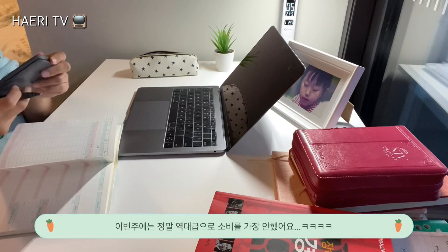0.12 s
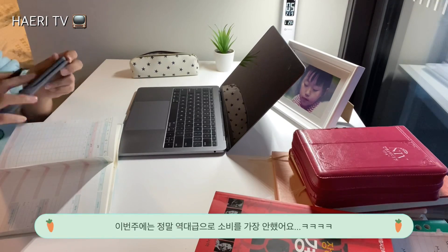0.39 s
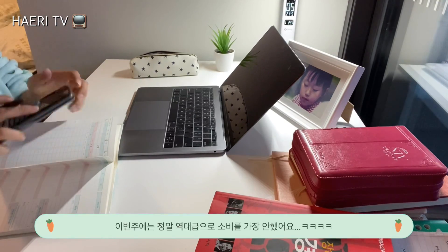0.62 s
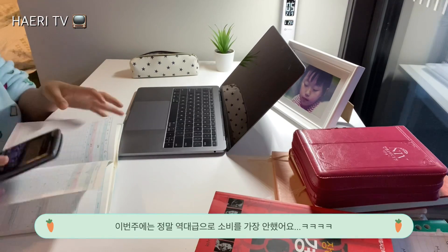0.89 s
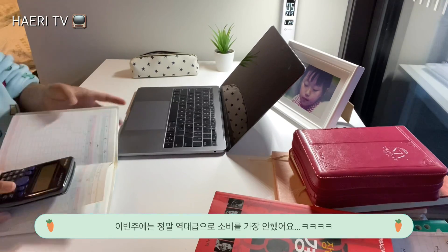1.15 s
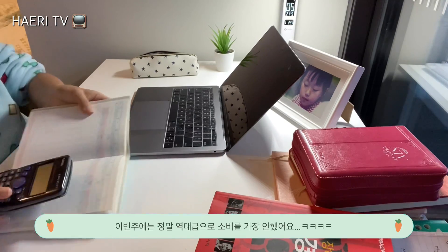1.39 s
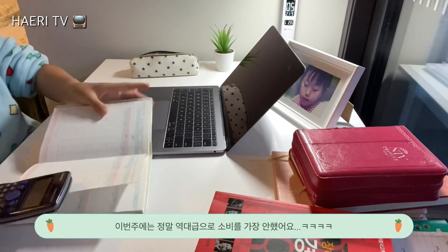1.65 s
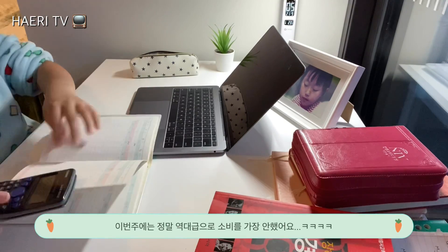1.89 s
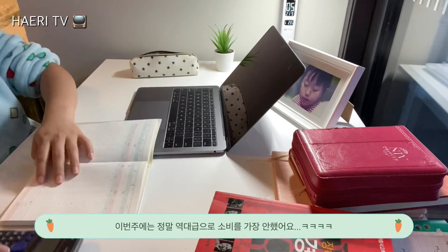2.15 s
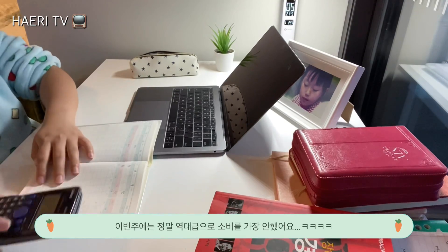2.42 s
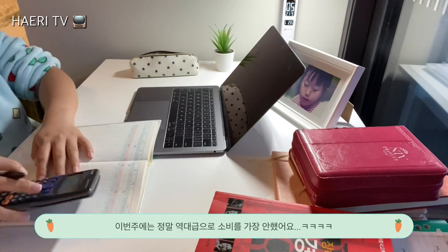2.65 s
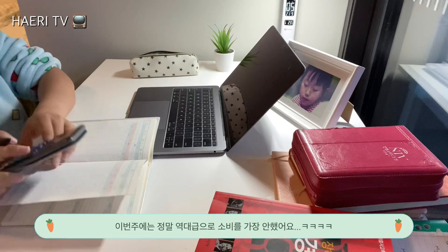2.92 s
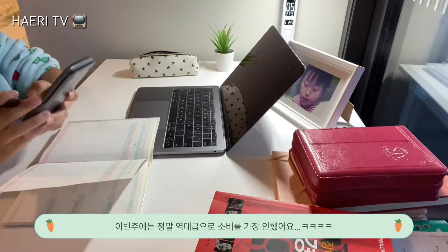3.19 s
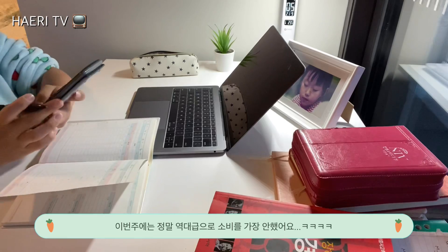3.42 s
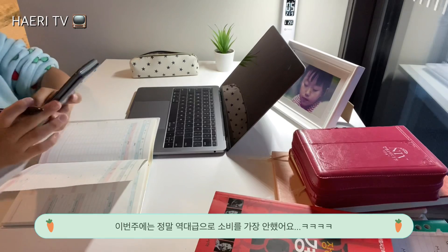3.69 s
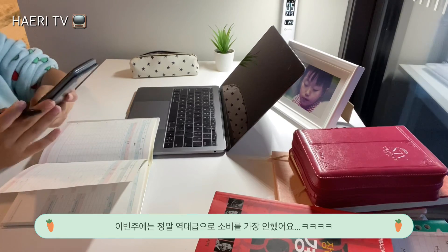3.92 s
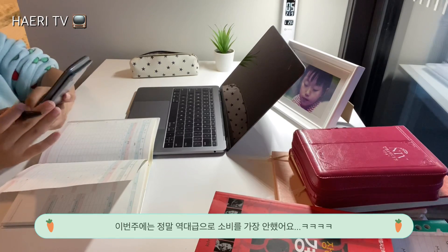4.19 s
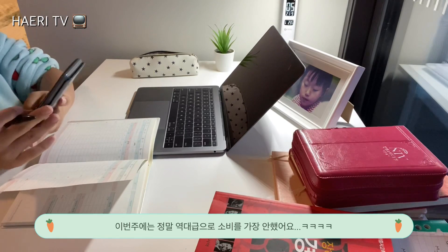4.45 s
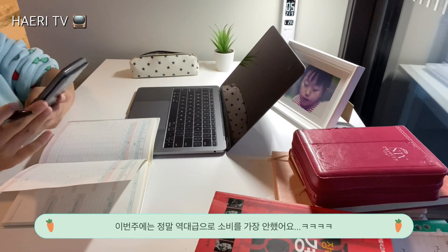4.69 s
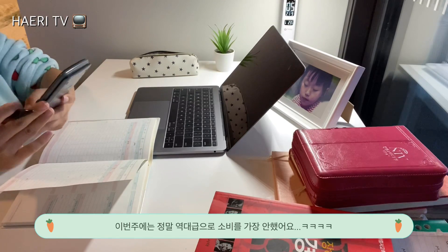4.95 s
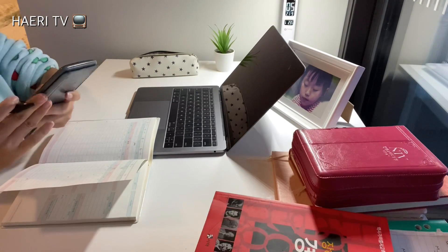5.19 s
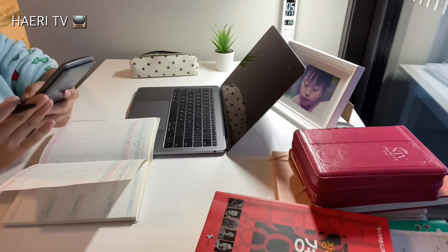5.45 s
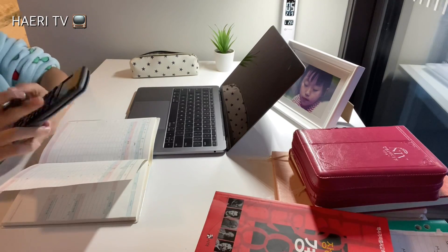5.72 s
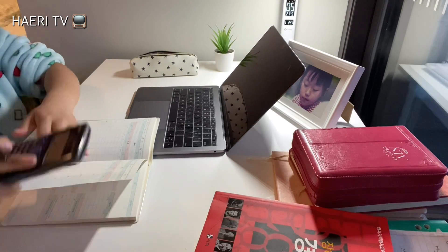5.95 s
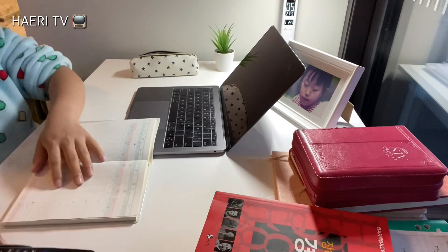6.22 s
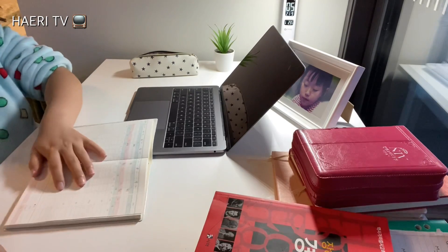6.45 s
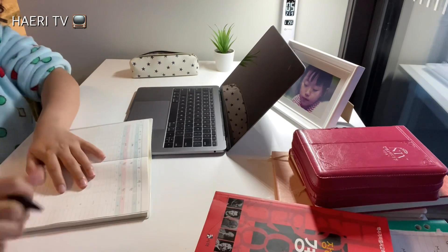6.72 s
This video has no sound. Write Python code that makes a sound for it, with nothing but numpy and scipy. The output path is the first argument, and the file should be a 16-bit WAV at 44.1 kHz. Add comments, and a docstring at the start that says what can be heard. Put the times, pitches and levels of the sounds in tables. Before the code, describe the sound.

In a small quiet room, close to the microphone, a notebook slides and flaps on a desk with light taps and dull thumps. Thin, very quiet calculator key clicks follow for about two seconds. After a brief lull, paper snaps, a calculator lands with a firm knock, and a pen hits the desk with the loudest, sharpest crack. Low room tone lies underneath.

```python
"""Hands at a desk in a small quiet room: a notebook is slid, lifted and patted flat, a calculator's keys are
pressed, then the calculator and a pen are put down hard. Taps and keys are noise snaps with a broad ring,
flapping pages are puffs of noise, rubbing is clumped random grains. Taps excite decaying desk modes near
120 Hz and up; echoes and noise tails give the room, over a low room tone. The recorder turns steady sound down."""
import sys
import numpy as np
from scipy import signal
from scipy.fft import rfft, irfft
from scipy.io import wavfile
from scipy.ndimage import uniform_filter1d

SR = 44100
rng = np.random.default_rng(int(sys.argv[2]) if len(sys.argv) > 2 else 0)


def invert_db(x):
    """Field ratio 10**(x/20) for x, a level in decibels (scalar or array-like)."""
    u = np.asarray(x, float) / 20
    return 10 ** u


def bounce(signal):
    """Save signal as a 16-bit WAV file at the path given by the first command-line argument."""
    frames = np.transpose(np.atleast_2d(signal))
    limited = np.clip(frames, -1, 1)
    pcm = np.round(limited * 32767).astype(np.int16)
    wavfile.write(sys.argv[1], SR, pcm)


N = 302085  # samples

# Source levels below are relative, ahead of the mix gains.
# Fingers, calculator and pen meeting paper or desk. Each row: start in seconds, click level in dB, ring in Hz,
# treble in dB re the click, weight in dB.
TAP_ROWS = [(0.3405, -49, 1040, -0.5, -59), (0.6562, -58, 1030, -2, -48), (0.676, -57, 703, -5, -49),
            (0.789, -53, 4000, 0, -66), (0.797, -56, 4400, 0, -67), (0.827, -50, 4200, 4.5, -70),
            (0.85, -48.5, 1040, -30, -55), (1.22, -49, 1300, -4, -64), (1.3709, -55.5, 1090, -27, -70),
            (1.4655, -38, 1010, -3, -34.5), (1.6807, -48, 710, -17, -41.5), (1.704, -45, 1040, -13, -49.5),
            (1.77, -55, 767, -17, -52.5), (1.8286, -58, 960, -17, -51.5), (1.9241, -46.5, 1390, -7, -58),
            (1.9403, -46, 1290, -7, -60), (2.187, -50.5, 770, 7.5, -42), (2.7395, -59, 1650, -3, -55.5),
            (2.7665, -48.5, 1410, -22, -58.5), (2.841, -61, 1100, -9, -66), (2.9284, -46, 3000, -4, -57),
            (2.9483, -46.5, 1560, -29, -64), (3.0043, -50, 1280, -8, -52.5), (3.0295, -49, 7500, -19, -67),
            (3.1181, -58, 1040, -17, -67), (5.855, -65.5, 3780, -10, -68), (5.911, -60, 1010, -3, -55),
            (5.9438, -44.5, 6280, -13, -65), (5.9695, -53, 1380, -17, -88), (5.987, -45, 1070, -4, -54.5),
            (6.1738, -66, 2800, -5, -51.5), (6.2354, -29, 820, 1.5, -30), (6.2505, -46, 770, -12, -33.5),
            (6.4558, -53, 3800, -5, -56.5), (6.4852, -43, 820, -11.5, -41),
            (6.5374, -11.5, 1340, -6.5, -21), (6.548, -17.5, 2430, -5, -29.5),
            (6.5556, -18, 1390, -15, -21)]
# Calculator keys. Each row: start in seconds, click level in dB, ring in Hz, treble in dB re the click,
# ring in dB re the click.
KEY_ROWS = [(3.259, -66.5, 3900, 8, -6), (3.3825, -50.5, 4150, 5.5, -6), (3.5338, -53.5, 3870, -33, -30),
            (3.7, -62.5, 1170, -16, -5), (3.7405, -57.5, 3850, -10, -9), (3.8171, -63, 3750, -30, -19),
            (4.0124, -54, 3650, -2, -11), (4.056, -56.5, 4160, -29, -10), (4.124, -61, 2400, -20, -7),
            (4.1654, -66, 2840, -4, -5), (4.49, -58, 1820, -3.5, -5.5), (4.667, -60, 4320, 0, -7),
            (4.8953, -57.5, 570, -6, -6), (4.9944, -51, 660, -7.5, -15), (5.0518, -55.5, 3850, 6, -14),
            (5.1245, -61, 1730, -22, -11), (5.157, -54, 4160, 0.5, -23), (5.3549, -59, 1800, -3.5, -16)]
# Pages flexing and pushing air. Each row: crest in seconds, level in dB, centre in Hz, rise in seconds,
# fall in seconds.
FLAP_ROWS = [(.70, -48.5, 820, 0.029, 0.016), (.885, -56, 600, 0.023, 0.012),
             (1.04, -57.5, 1250, 0.052, 0.038), (1.237, -42, 1290, 0.0074, 0.0095),
             (1.668, -49.5, 2800, 0.013, 0.0092), (1.712, -40, 990, 0.0083, 0.011),
             (1.957, -38.5, 1320, 0.011, 0.0042), (3.02, -57.5, 386, 0.066, 0.037),
             (5.998, -36.5, 1204, 0.0095, 0.0028)]
# Paper and skin sliding, one table a stroke. Each row: time in seconds, level in dB, treble in dB re that,
# low band in dB re that.
RUB_STROKES = [
    [(0.655, -76.5, 13, 21), (0.728, -76.5, 8.5, 23), (0.796, -63, 2, -4), (0.9, -77, -9, 17),
     (0.96, -74.5, -8, 8), (1.034, -60.5, -6.5, -2.5), (1.146, -88, -10, 18)],
    [(1.18, -79, 8, 1), (1.19, -65.5, 2.5, 8), (1.215, -81, 0, 14), (1.232, -54.5, -14, -5),
     (1.254, -65, 0, 9), (1.346, -72.5, 7, 3), (1.445, -75.5, 12.5, 9.5), (1.462, -56, 5, -3)],
    [(1.5, -64, 5.5, 11.5), (1.57, -68.5, 0, 0), (1.644, -58, 1, -6.5), (1.665, -70.5, 17, 19.5),
     (1.712, -74.5, 7, 18.5), (1.79, -86, 15, -3)],
    [(1.8, -78, 8, 6), (1.918, -70, -7, -4), (1.952, -56.5, 2, 12), (2.01, -69.5, -1, 12),
     (2.06, -89, -12, 29.5)],
    [(2.68, -77, -12, -9), (2.77, -68.5, 3, 6), (2.818, -79.5, 8, 15), (2.868, -73, 8.5, -7),
     (2.908, -77.5, 5, -2), (2.934, -50.5, 2.5, -6.5), (3.026, -85, 9, -14), (3.076, -74, 1, -10),
     (3.15, -97, -2, 6)],
    [(5.845, -77, 8, -13), (5.94, -78, -1, 8.5), (5.996, -71, 7, 17.5), (6.076, -70, 3, 9.5),
     (6.21, -90, 2, 23.5)],
]
# Desk shaken by the moving notebook. Each row: time in seconds, level in dB.
SHAKE_LEVELS = [(0.6, -61), (0.69, -66), (0.77, -77), (0.89, -53.5), (1.43, -68), (1.51, -44.5),
                (1.64, -57), (1.7, -39.5), (1.82, -60), (1.88, -54), (2.17, -59.5), (2.29, -53.5),
                (2.44, -73), (2.78, -68.5), (3.0, -52), (3.26, -88), (3.38, -57), (3.68, -76)]
# Desk top modes. Each row: frequency in Hz, level in dB, t60 in seconds.
DESK_MODES = [(122.9, 3.5, 0.49), (282.7, -9.5, 0.4), (439.4, -17.5, 0.4), (533, -9, 0.22),
              (780, -38, 0.14), (895, -8, 0.11), (850, -20, 0.057)]
# Room decay. Each row: frequency in Hz, t60 in seconds.
ROOM_T60 = [(150, 0.59), (500, 0.65), (1500, 0.49), (4000, 0.56), (8000, 0.44), (13000, 0.32)]
# Spectrum of the tail of a blow just past. Each row: frequency in Hz, relative density in dB per Hz.
EARLIER_SPECTRUM = [(35, -47), (60, -11), (113, -11), (214, -17), (341, -6), (469, -24.5), (631, -5.5),
                    (763, -23.5), (1050, -4.5), (1640, -16), (1820, -14), (8190, -22), (9500, -22),
                    (12400, -52.5), (20900, -120)]
# Room tone spectrum. Each row: frequency in Hz, relative density in dB per Hz.
AIR_SPECTRUM = [(15, -31), (25, -2), (60, -1), (95, -4), (124, 0), (152, -10.5), (305, -20.5), (650, -29),
                (1050, -24.5), (1400, -27), (2200, -30.5), (4000, -37), (8000, -39.5), (16000, -45)]
# Room tone balance. Each row: frequency in Hz, left minus right in dB.
AIR_BALANCE = [(60, -2), (380, -2.5), (2380, -1), (15000, 0)]
# Left-right likeness of diffuse sound. Each row: frequency in Hz, likeness from 0 to 1.
LIKENESS = [(40, 0.88), (130, 0.64), (290, 0.44), (640, 0.011), (15000, 0.1)]
# Echoes off desk top, laptop screen and wall. Each row: left delay in seconds, left level in dB, right level in dB.
NEAR_ECHOES = [(.0011, -18.5, -16), (.0026, -4, -0.5), (.0047, -5.5, -12.5), (.0083, -7, -8.5),
               (0.0126, -7.5, -6), (.018, -11, -12)]
# Most that the suppressor lowers steady sound. Each row: frequency in Hz, gain in dB.
DUCKING_DEPTH = [(250, -4.5), (600, -5.5), (2000, -10.5), (15000, -3.5)]
# Microphone response. Each row: frequency in Hz, gain in dB.
MICROPHONE_RESPONSE = [(30, -1.5), (200, -1), (3500, -1), (5500, -1.5), (7700, -1.5), (9500, -5.5),
                       (12500, -6), (15800, -0.5), (16600, -26)]
# Treble bands that sound faint in the mid. Each row: low edge in Hz, high edge in Hz, gain in dB.
MID_FAINT_BANDS = [(9650, 11250, -12), (14420, 20000, -12)]
# Treble bands that sound faint in the side. Each row: low edge in Hz, high edge in Hz, gain in dB.
SIDE_FAINT_BANDS = [(7140, 8200, -25), (12640, 14700, -45)]


def evened(x):
    """Scales to rms 1."""
    return x / np.sqrt(np.mean(x ** 2) + 1e-20)


def peaked(x):
    """Scales the loudest 128-sample stretch to rms 1."""
    return x / np.sqrt(uniform_filter1d(x ** 2, size=128).max())


def read(points, hz):
    """Reads a table's curve on a log frequency axis."""
    f, value = np.transpose(points)
    return np.interp(np.log(hz + 1), np.log(f + 1), value)


def add(mix, start_s, sound):
    """Adds a sound into the mix in place."""
    part = mix[max(round(start_s * SR), 0):][:len(sound)]
    part += sound[:len(part)]


def band(x, lo_hz, hi_hz):
    """Butterworth band-pass."""
    sos = signal.butter(2, [lo_hz, min(hi_hz, .45 * SR)], "bandpass", fs=SR, output="sos")
    return signal.sosfilt(sos, x)


def resonate(x, hz, width_hz):
    """Moving resonance: shifts the curve hz down to zero, smooths, shifts back."""
    turn = np.exp(2j * np.pi * np.cumsum(hz) / SR)
    pole = np.exp(-np.pi * width_hz / SR)
    return 2 * (turn * signal.lfilter([1 - pole], [1, -pole], x / turn)).real


def lumps_gain(noise, size):
    """Slow random gain, within 4 dB either way."""
    return invert_db(2.0 * np.clip(evened(uniform_filter1d(noise, size=size)), -2, 2))


def click(db, hz, treble_db, ring_db, lo_hz, hi_hz, crack_s, scuff_db, ring_width_hz):
    """A snap, a few ms of crackle and a grainy scuff; treble apart; a broad resonance of the struck object."""
    t = np.arange(4000) / SR
    shape = np.exp(-t / crack_s) + invert_db(scuff_db) * np.exp(-t / 0.02)
    crack = rng.standard_normal((2, len(t))) * shape * (1 - np.exp(-t / 0.00021))
    crack[:, 20] += 4.5  # the snap evens out the spectrum
    z = rfft(crack)
    flat = z / np.sqrt(uniform_filter1d(abs(z) ** 2, size=16, axis=1))  # no pitch of its own
    crack = irfft(flat, len(t))
    ring_hz = np.full(len(t), hz)
    ring = peaked(resonate(resonate(crack[0], ring_hz, ring_width_hz), ring_hz, ring_width_hz))
    body = peaked(band(band(crack[0], lo_hz, hi_hz), lo_hz / 1.5, hi_hz * 1.74))
    treble = peaked(band(crack[1], 6000, 15500))
    return invert_db(db) * (body + invert_db(ring_db) * ring + invert_db(treble_db) * treble)


def taps():
    """Each tap: a click, and its weight going into the dull body of the paper stack and the desk."""
    body_db, boom_db = -1, 1.5
    heavy_db, heavy_share = -36.5, 0.68  # of the weight above heavy_db, the desk takes only a share
    air, push, t = np.zeros(N), np.zeros(N), np.arange(4000) / SR
    for s, db, hz, treble_db, weight_db in TAP_ROWS:
        add(air, s, click(db, hz, treble_db, ring_db=-7.5, lo_hz=hz / 2.34, hi_hz=hz * 3.1,
                          crack_s=0.0014, scuff_db=-25.5, ring_width_hz=600))
        body = band(rng.standard_normal(len(t)) * t * np.exp(-t / 0.0036), 166, 542)
        add(air, s, invert_db(weight_db + body_db) * peaked(body))
        held_back_db = (1 - heavy_share) * max(weight_db - heavy_db, 0)
        add(push, s, invert_db([boom_db + weight_db - held_back_db]))
    return air, push


def desk(push):
    """The desk top's modes build over the first cycles, on a short low lurch of the whole frame."""
    t = np.arange(SR // 2) / SR
    modes = sum(invert_db(db - 60 * t / t60_s) * np.sin(2 * np.pi * hz * t) for hz, db, t60_s in DESK_MODES)
    lurch = invert_db(-5.5 - 60 * t / 0.19) * np.sin(2 * np.pi * 62 * t)
    build = 1 - np.exp(-t / 0.0082)
    return signal.oaconvolve(push, (modes + lurch) * build)[:N]


def keys():
    """Thin plastic clicks with a soft low thud of the thumb."""
    thud_re_click_db, thud_hz, thud_t60_s = -3, 112, 0.22
    air, thud, t = np.zeros(N), np.zeros(N), np.arange(6000) / SR
    for s, db, hz, treble_db, ring_db in KEY_ROWS:
        add(air, s, click(db, hz, treble_db, ring_db, lo_hz=min(1100, 0.31 * hz), hi_hz=5300,
                          crack_s=0.001, scuff_db=-11.5, ring_width_hz=450))
        thud_db = db + thud_re_click_db - 60 * t / thud_t60_s
        add(thud, s, invert_db(thud_db) * np.sin(2 * np.pi * thud_hz * t))
    return air, thud


def flaps():
    """A soft-edged band of noise, broken into coarse lumps as the sheet buckles."""
    air = np.zeros(N)
    t = np.arange(-.08, .15, 1 / SR)
    for s, db, hz, rise_s, fall_s in FLAP_ROWS:
        noise, lumps = rng.standard_normal((2, len(t)))
        swell = np.exp(-(t / np.where(t < 0, rise_s, fall_s)) ** 2)
        puff = evened(band(band(noise, hz / 2.04, hz * 1.49), hz / 2.3, hz * 1.82))
        add(air, s - .08, invert_db(db) * puff * swell * lumps_gain(lumps, 150))
    return air


def rubs():
    """Fibres catch and let go: clumped random grains under each stroke; the sheet colours them as it bends."""
    # a sheet pressed harder than gently is tighter and sounds higher
    sheet_hz, sheet_hz_per_db, gentle_db = 1080, 21, -59.5
    air = np.zeros(N)
    clumps = lumps_gain(rng.standard_normal(N), 300)
    strength = invert_db(2.5 * np.minimum(rng.exponential(1, N), 4))
    present = rng.random(N) < .2
    grains = rng.standard_normal((3, N)) * strength * present * clumps
    mid = evened(band(band(grains[0], 1550, 4430), 2250, 9600))
    treble = evened(band(band(grains[1], 5700, 18000), 5600, 19000))
    low = evened(band(band(grains[2], 161, 1150), 125, 990))
    for rows in RUB_STROKES:
        s, *columns = np.transpose(rows)
        at = slice(round(s[0] * SR), round(s[-1] * SR))
        db, treble_db, low_db = (np.interp(np.arange(N)[at] / SR, s, c) for c in columns)
        hz = sheet_hz + sheet_hz_per_db * np.maximum(db - gentle_db, 0)
        sheet = invert_db(-1.5 + 0.33 * low_db) * evened(resonate(resonate(grains[0, at], hz, 440), hz, 540))
        stroke = mid[at] + sheet + invert_db(treble_db) * treble[at] + invert_db(low_db) * low[at]
        add(air, s[0], invert_db(db) * stroke * signal.windows.tukey(len(db), .04))
    return air


def shake():
    """A lumpy low rumble around the desk's lowest mode."""
    s, db = np.transpose(SHAKE_LEVELS)
    rumble = evened(band(rng.standard_normal(N), 90, 145))
    return rumble * invert_db(np.interp(np.arange(N) / SR, s, db, -120, -120))


def nearby(air):
    """Direct sound, later and stronger on the right, and its first echoes off nearby surfaces."""
    right_lag_samples, right_db = 5, 2.0  # the hands are nearer the left microphone
    out = np.array([air, invert_db(right_db) * np.roll(air, right_lag_samples)])
    for s, left_db, right_db in NEAR_ECHOES:
        delayed = np.array([np.roll(air, round(s * SR)), np.roll(air, round(1.1 * s * SR))])
        out += invert_db([[left_db], [right_db]]) * delayed
    return out


def diffuse(z):
    """Mixes two unrelated short-time spectra into a stereo pair, most alike in the bass."""
    same = np.clip(read(LIKENESS, np.linspace(0, SR / 2, z.shape[1])), 0, 1)[:, None]
    shared, differing = np.sqrt((1 + same) / 2), np.sqrt((1 - same) / 2)
    return np.array([shared * z[0] + differing * z[1], shared * z[0] - differing * z[1]])


def tail(slower=1):
    """Noise dying band by band at the room's speed, left energy 1."""
    hz, t, z = signal.stft(rng.standard_normal((2, SR // 2)), SR, nperseg=256)
    clutter = invert_db(2.5 - 60 * t / 0.24)  # things on the desk scatter strongly but briefly
    decay = invert_db(-60 * t / (slower * read(ROOM_T60, hz)[:, None])) + clutter
    out = signal.istft(diffuse(z) * decay, SR, nperseg=256)[1]
    return out / np.linalg.norm(out[0])


def room(x):
    """Three different tails take turns, so that echoes vary from blow to blow; each builds in about 1 ms."""
    out, turn = np.zeros((2, N)), np.arange(N) / SR * 2.3
    for k in range(3):
        window = np.sqrt(2 / 3) * np.cos(np.pi * (turn + k / 3))
        answer = tail()
        build = 1 - np.exp(-(np.arange(answer.shape[1]) / SR / 0.00098) ** 2)
        out += signal.oaconvolve((x * window)[None], answer * build, axes=1)[:, :N]
    return out


def earlier():
    """Only the room's answer is left of a blow that fell a moment ago; late sound dies more slowly."""
    hz, t, z = signal.stft(tail(slower=1.33), SR, nperseg=512)
    gain = invert_db(read(EARLIER_SPECTRUM, np.minimum(hz, 9000)))[:, None]
    out = signal.istft(z * gain, SR, nperseg=512)[1]
    out = invert_db(-34.5) * out / out[:, :900].std()
    return np.pad(out, ((0, 0), (0, N)))[:, :N]


def room_tone():
    """Low rumble that wavers in patches over a faint hiss."""
    hz, t, z = signal.stft(rng.standard_normal((2, N + 2048)), SR, nperseg=2048, noverlap=1536)
    noise = rng.standard_normal(z.shape[::-1][:2]).T
    patches = evened(uniform_filter1d(uniform_filter1d(noise, 4, 0), 8, 1))
    lean_db = np.array([.5, -.5])[:, None, None] * read(AIR_BALANCE, hz)[:, None]
    gain = invert_db(read(AIR_SPECTRUM, hz)[:, None] + lean_db + 2.3 * patches)
    out = signal.istft(diffuse(z) * gain, SR, nperseg=2048, noverlap=1536)[1]
    return invert_db(-59) * evened(out[:, :N])


def scene():
    """Hands, desk and shaking, with the room around."""
    tapped, push = taps()
    keyed, thud = keys()
    air = invert_db(-2.5) * (tapped + keyed + flaps() + rubs())
    near_and_room = nearby(air) + invert_db(0.5) * room(air)
    return near_and_room + invert_db(-2) * desk(push) + thud + shake() + earlier() + room_tone()


def suppress(x):
    """Bands near their own steady level are lowered; they open at once and close more slowly."""
    hz, t, z = signal.stft(x, SR, nperseg=512, noverlap=384)
    power = (abs(z) ** 2).mean(0)
    smooth = uniform_filter1d(uniform_filter1d(power, size=24, axis=0), size=3, axis=1)
    power_db = 10 * np.log10(smooth + 1e-18)
    fall_db = 145.0 * t  # 145 dB a second
    held_db = np.maximum.accumulate(power_db + fall_db, axis=1) - fall_db
    over_db = held_db - np.percentile(held_db, q=15, axis=1)[:, None]
    shut = np.clip(1 - over_db / 9.6, 0, 1)  # fully open 9.6 dB above steady
    gain = invert_db(read(DUCKING_DEPTH, hz)[:, None] * shut)
    return signal.istft(z * gain, SR, nperseg=512, noverlap=384)[1][:, :N]


def microphone_and_faint_bands(x, faint_bands):
    """Applies the microphone response and, separately from it, lowers the given treble bands with soft edges."""
    hz = np.fft.rfftfreq(N, 1 / SR)
    faint_db = sum(db * ((hz > lo_hz) & (hz < hi_hz)) for lo_hz, hi_hz, db in faint_bands)
    soft_faint_db = uniform_filter1d(1. * faint_db, size=1000)
    return irfft(rfft(x) * invert_db(read(MICROPHONE_RESPONSE, hz) + soft_faint_db), N)


def low_pass(x):
    """Removes everything above the highest recorded frequency."""
    return signal.sosfilt(signal.butter(12, 16360, fs=SR, output="sos"), x)


def record(dry):
    """Suppressor, then microphone response and faint treble bands on the mid and the side."""
    left, right = suppress(dry)
    mid = microphone_and_faint_bands((left + right) / 2, MID_FAINT_BANDS)
    side = microphone_and_faint_bands((left - right) / 2, SIDE_FAINT_BANDS)
    return low_pass(np.array([mid + side, mid - side]))


dry = scene()
out = record(dry)
bounce(out)
```